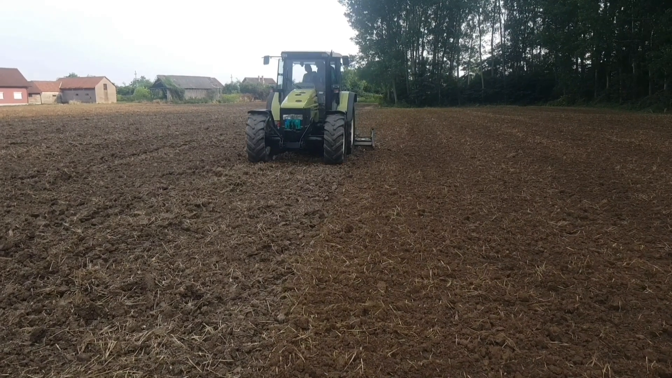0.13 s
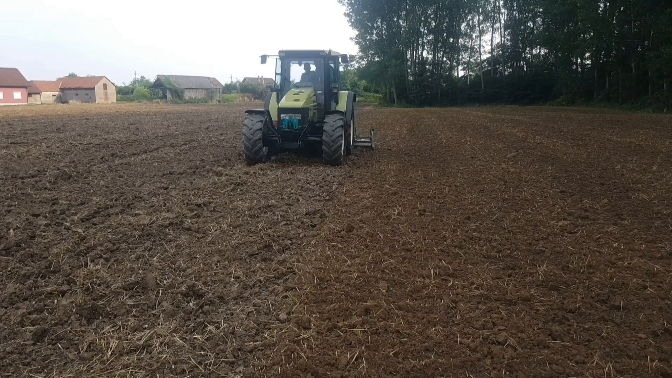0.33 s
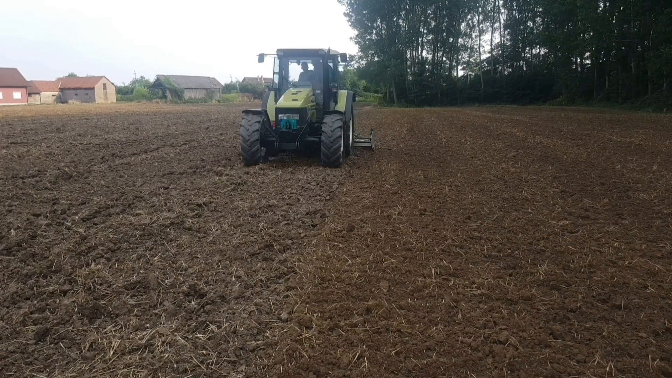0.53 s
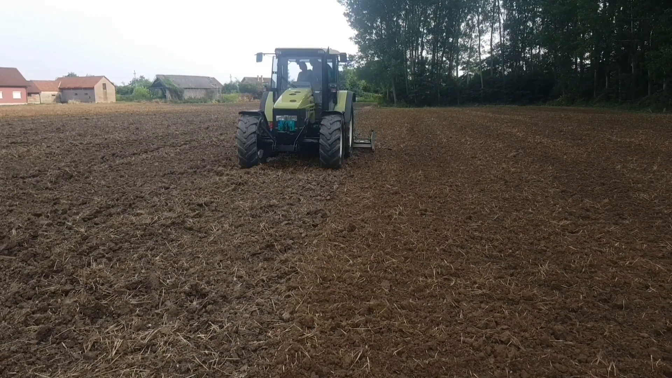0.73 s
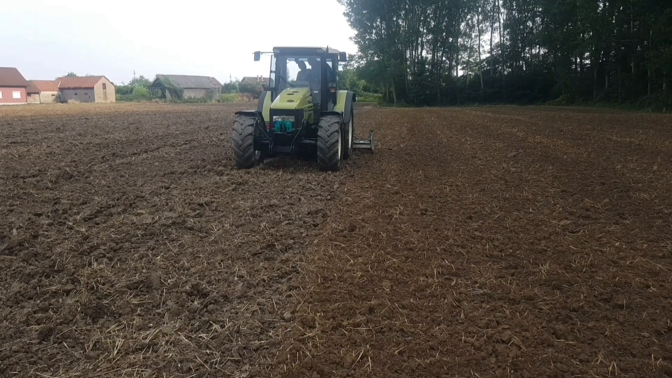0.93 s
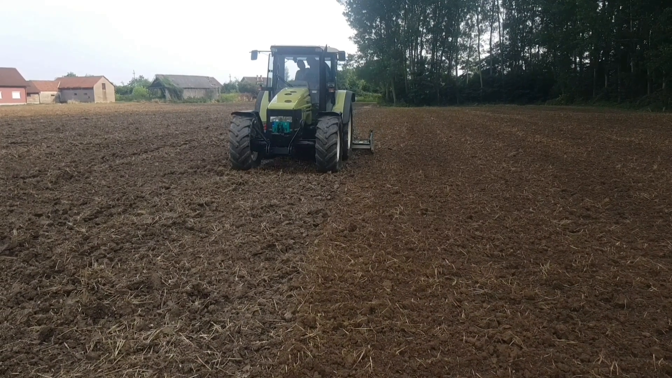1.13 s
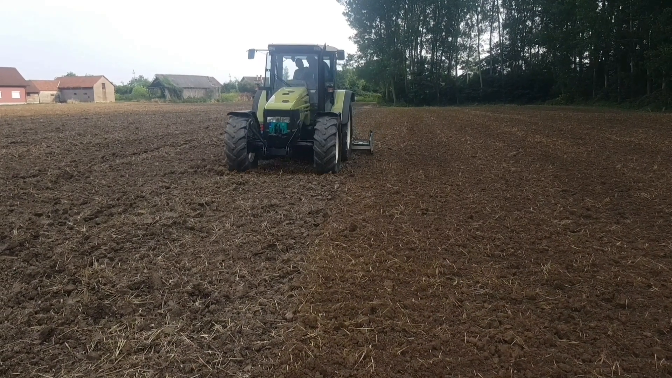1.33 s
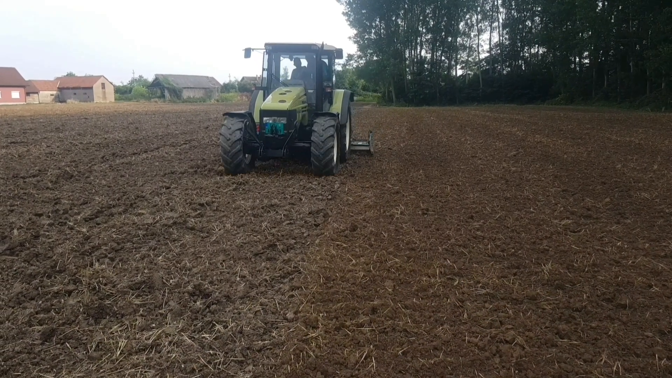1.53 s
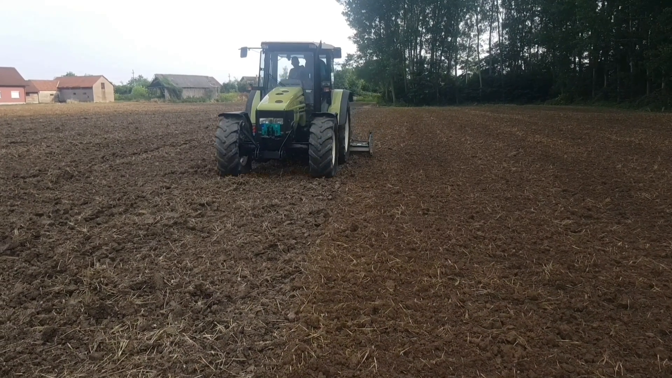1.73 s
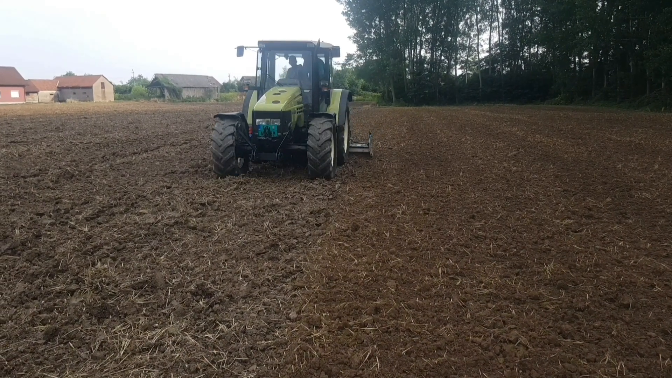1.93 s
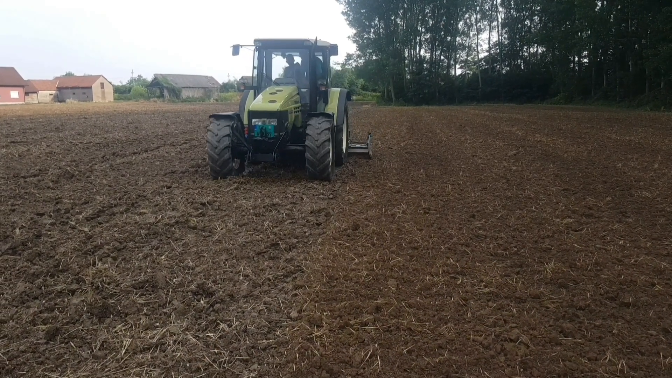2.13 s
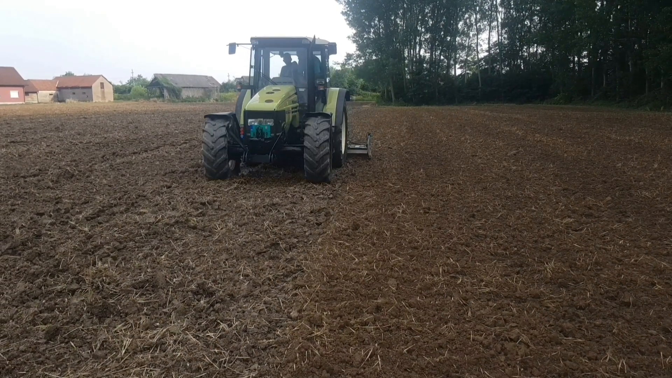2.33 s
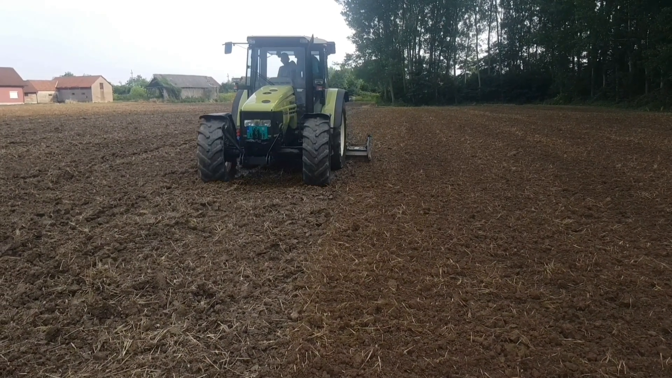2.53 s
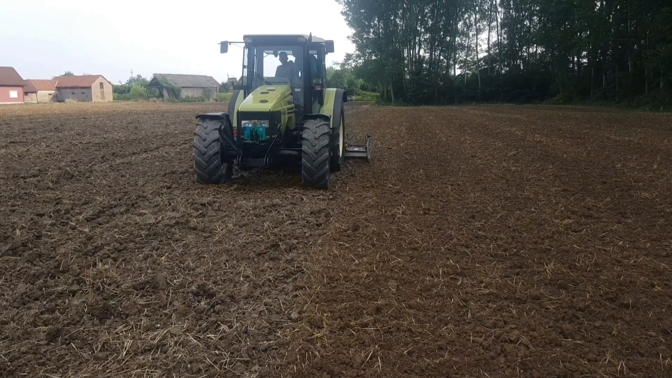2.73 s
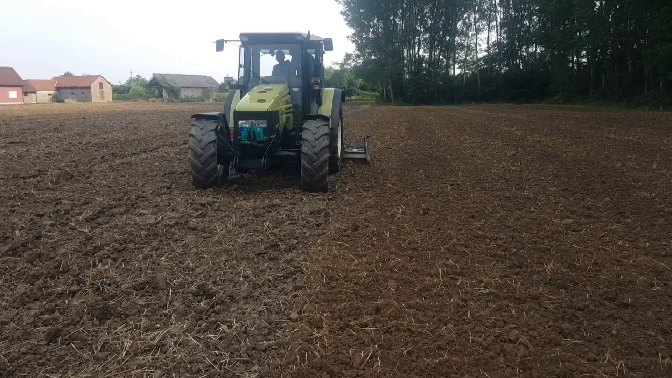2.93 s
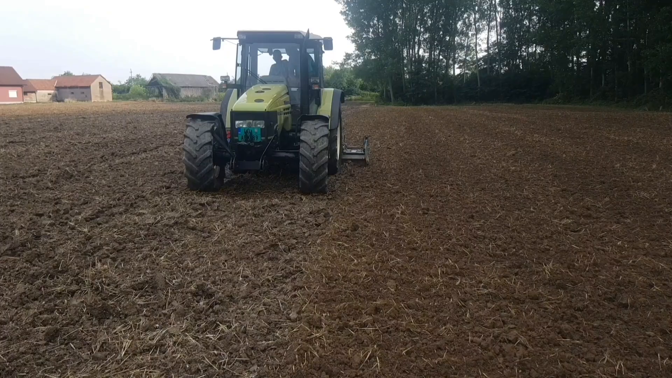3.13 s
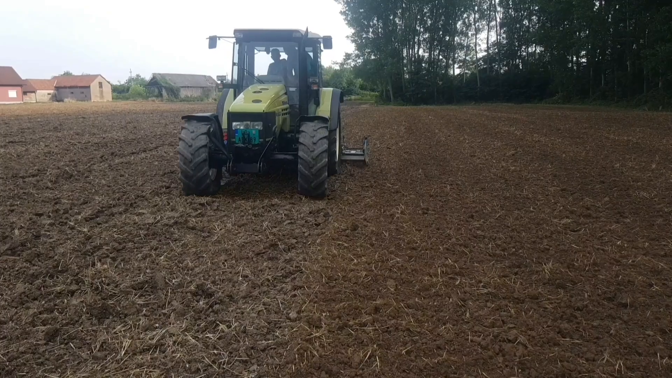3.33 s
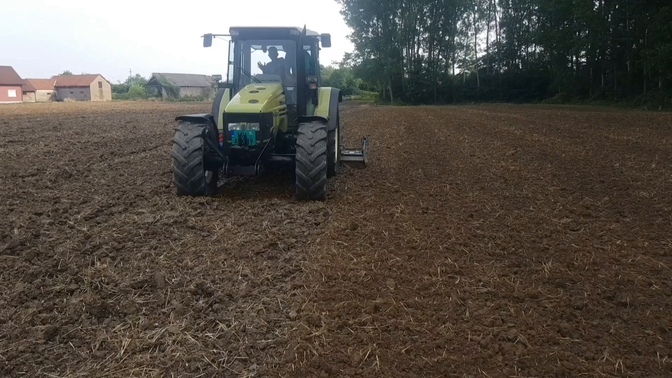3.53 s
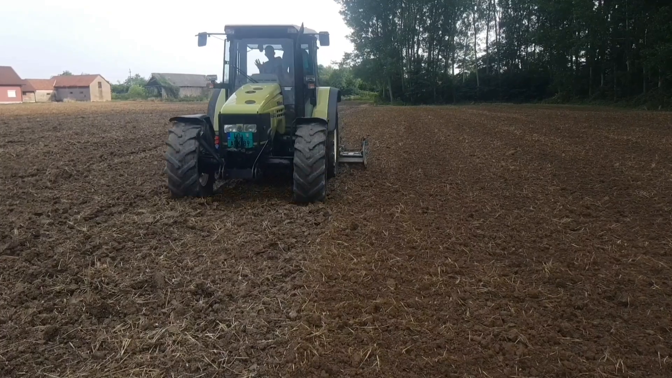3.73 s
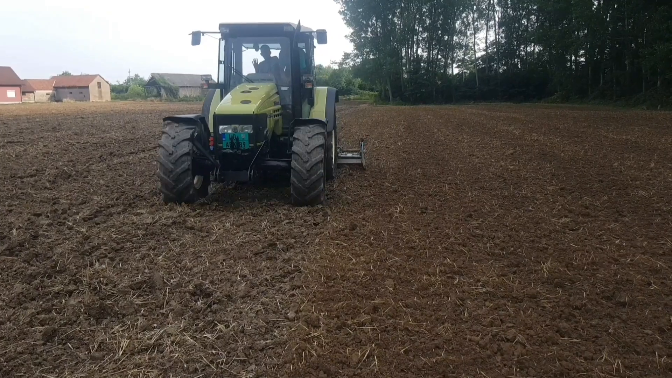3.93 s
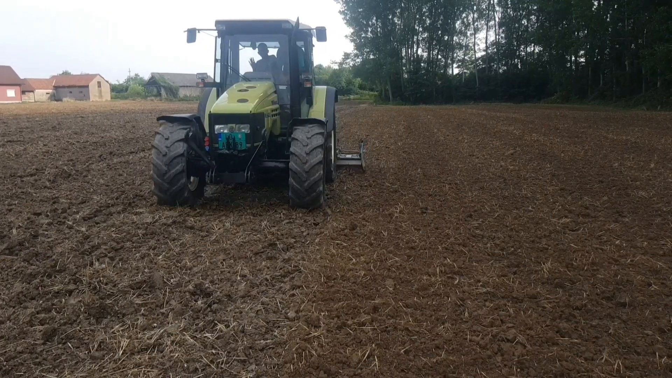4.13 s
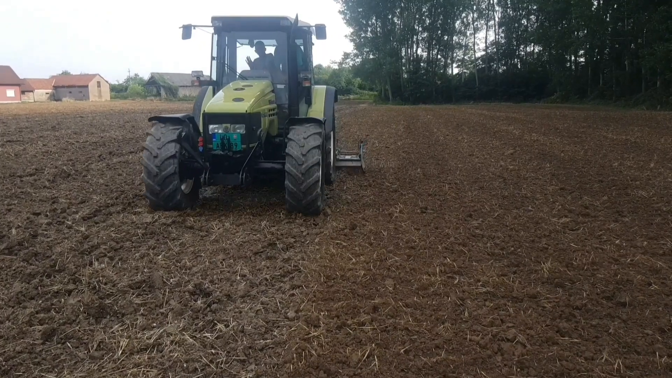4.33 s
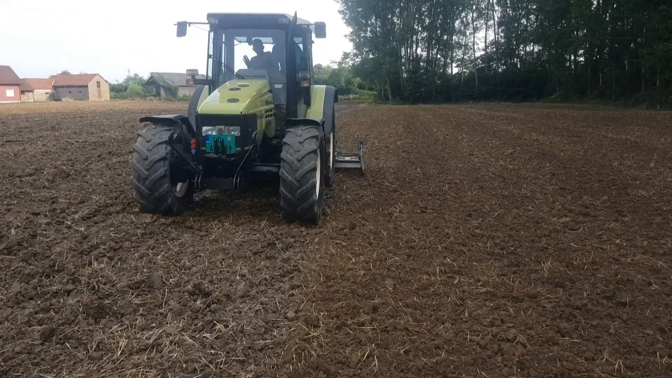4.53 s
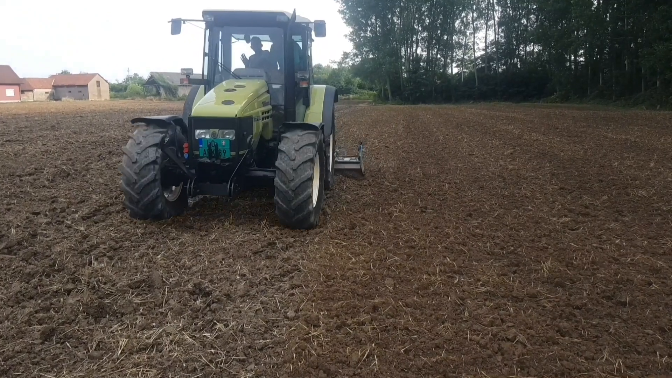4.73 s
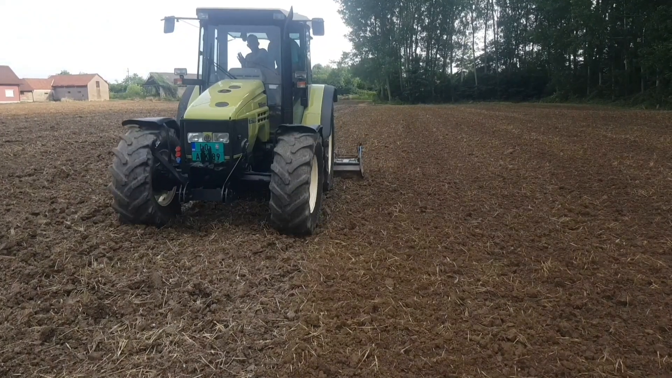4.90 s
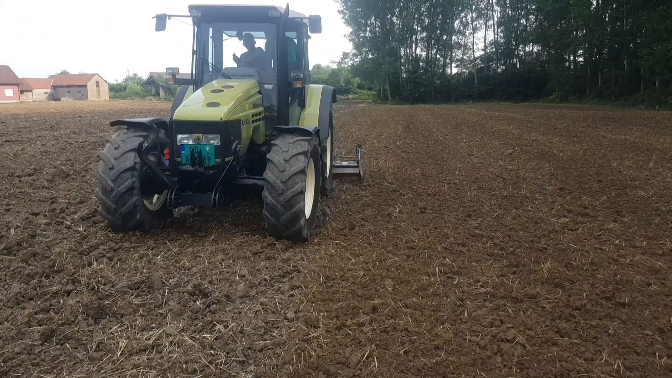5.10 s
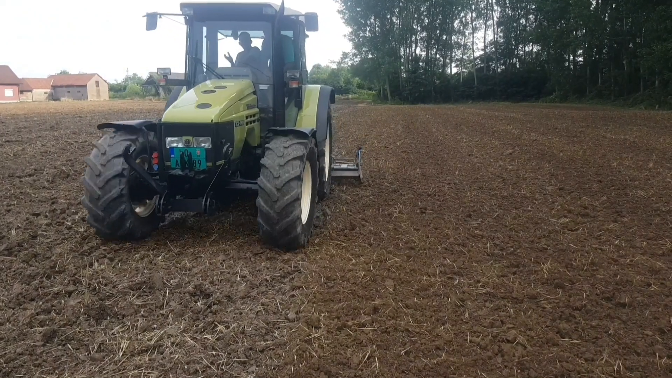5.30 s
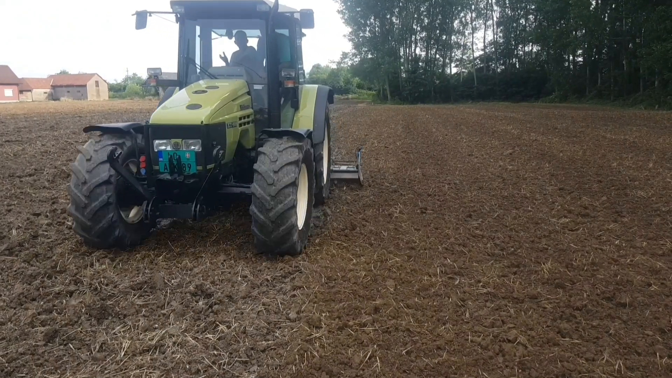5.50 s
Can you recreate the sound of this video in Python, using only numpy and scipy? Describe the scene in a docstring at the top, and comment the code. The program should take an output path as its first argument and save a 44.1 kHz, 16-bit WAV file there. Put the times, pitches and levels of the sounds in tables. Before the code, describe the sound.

A tractor diesel drones steadily under load, with a singing fan and hard clatter, slowly approaching as its harrow hisses through dry stubble.

```python
"""A deep exhaust drone with a singing fan, a hard diesel clatter and a dry hiss of soil and straw:
a four-cylinder tractor pulls a harrow over a stubble field, slowly approaching the microphone.
Exhaust, fan, gears and growl are tones locked to one crankshaft; roar, clatter and air are coloured noise
pulsed by the firings; the harrow adds hiss, clinks and crackles. The speed sags and recovers with the load."""
import sys
import numpy as np
from scipy import signal
from scipy.fft import rfft, irfft
from scipy.io import wavfile
from scipy.ndimage import uniform_filter1d, map_coordinates

SR = 44100
rng = np.random.default_rng(int(sys.argv[2]) if len(sys.argv) > 2 else 0)


def dump_mix(stems):
    """Bounce the given channels to the path in sys.argv[1] as a 16-bit WAV at rate SR."""
    frames = np.atleast_2d(stems).T  # one column per channel
    limited = np.clip(frames, -1, 1)  # hard clip at full scale
    pcm = np.round(limited * 32767).astype(np.int16)
    wavfile.write(sys.argv[1], SR, pcm)


N = 249606
TIME = np.arange(N) / SR
BINS_HZ = np.fft.rfftfreq(N, 1 / SR)


def gain_of(db):
    """Decibels to an amplitude factor."""
    return 10 ** (np.asarray(db) / 20)


def evened(x):
    """Scales a signal to rms 1, all channels together."""
    return x / np.sqrt(np.mean(x ** 2) + 1e-20)


def read(points, hz):
    """A spectrum, joined on a log-frequency axis."""
    f, value = np.transpose(points)
    return np.interp(np.log(hz + 1), np.log(f + 1), value)


def curves(rows):
    """Each column of a timed table at every sample."""
    s, *columns = np.transpose(rows)
    return [np.interp(TIME, s, column) for column in columns]


def drift(rate_hz):
    """Slow chance of rms 1: noise that fades out above the given rate."""
    lowpass = np.exp(-(BINS_HZ / rate_hz) ** 2) * (BINS_HZ > 0)
    return evened(irfft(rfft(rng.standard_normal(N)) * lowpass, N))


def ports(pair, colour_db):
    """Colours two signals and blends them for two microphone ports, mostly alike in the bass, apart on top."""
    # likeness of the two ports: (f/Hz, likeness 0 to 1)
    likeness = [(60, 0.97), (450, 1), (730, 0.93), (1200, 0.68), (2000, 0.97), (3300, 0.33), (5500, 0.28),
                (9000, 0.12), (15000, .1)]
    a, b = rfft(pair) * gain_of(colour_db)
    alike = np.clip(read(likeness, BINS_HZ), 0, 1)
    left = alike * a + np.sqrt(1 - alike ** 2) * b
    return evened(irfft([left, a], N))


def tone(firings, order, db, phase=0):
    """One clean multiple of the four-firing cycle; the level is rms, the phase in turns."""
    return np.sqrt(2) * gain_of(db) * np.sin(2 * np.pi * (order * firings / 4 + phase))


def bursts(firings, depth, decay, uneven_db, scatter_db):
    """Each firing gives a surge that dies away; the cylinders differ, and so does each stroke."""
    stroke = firings.astype(int)
    cylinder_db = uneven_db * np.cos(np.pi / 2 * stroke)
    stroke_db = scatter_db * rng.standard_normal(stroke.max() + 1)[stroke]
    fade = np.exp(-(firings % 1) / decay)
    return evened(1 + depth * gain_of(cylinder_db + stroke_db) * fade)


def repeating(cycles, size=8192):
    """Two random rattles that come back alike in every engine cycle, with all their orders equally strong."""
    pattern = irfft(np.exp(2j * np.pi * rng.random((2, size // 8))), size * 2)
    place = np.arange(size * 2) / (size * 2)
    return evened(np.array([np.interp(cycles, place, row, period=1) for row in pattern]))


def combustion(firings, repeat, surge):
    """Noise that is partly the same in each cycle and partly fresh, pulsed by the firings."""
    repeat = np.clip(repeat, 0, 1)
    same = np.sqrt(repeat) * repeating(firings / 4)
    fresh = np.sqrt(1 - repeat) * rng.standard_normal((2, N))
    return surge * (same + fresh)


# In the layers below, near_db is the gain from nearing (0 at the start), near_share the part a layer takes.
def straw(near_db, level_db=-68.5, near_share=.6, per_s=70, spread_db=4.0, snap_s=.0006):
    """Dry stubble snaps under the tyres: tiny crackles of decaying noise at the very top."""
    # colour of the crackle: (f/Hz, relative level/dB)
    crackle_colour = [(3000, -30), (6000, -6), (9000, -9), (12000, 0), (15000, 0)]
    force_db = spread_db * np.minimum(rng.exponential(1, N), 3)
    # the order of the draws does not matter: each sample may snap by chance
    snaps = (rng.random(N) < per_s / SR) * gain_of(force_db)
    envelope = signal.lfilter([1], [1, -np.exp(-1 / (snap_s * SR))], snaps)
    crackle = envelope * rng.standard_normal((2, N))
    return gain_of(level_db + near_share * near_db) * ports(crackle, read(crackle_colour, BINS_HZ))


def tines(near_db, level_db=-49.0, near_share=0.77, per_s=90, spread_db=2.0, ring_s=0.0028):
    """Clods and stones hit the harrow: a dense, faint clinking, each part with a pitch of its own."""
    # clinks of the harrow: (lowest f/Hz, highest f/Hz)
    clink_range = (997, 2510)
    parts = 12
    t, out = np.arange(0, .03, 1 / SR), np.zeros((2, N))
    for hz in np.geomspace(*clink_range, parts):
        force_db = spread_db * np.minimum(rng.exponential(1, N), 2)
        hits = (rng.random(N) < per_s / parts / SR) * gain_of(force_db)
        clink = np.exp(-t / ring_s) * np.sin(2 * np.pi * hz * t)
        out += rng.uniform(0.3, 1, (2, 1)) * signal.oaconvolve(hits, clink)[:N]
    return gain_of(level_db + near_share * near_db) * evened(out)


def harrow(firings, near_db, level_db=-54.5, near_share=0.68, grain_db=0.7):
    """Fine hiss of crumbling soil and straw, with a little pulsing hiss from the engine."""
    # colour of the hiss: (f/Hz, relative level/dB)
    hiss_colour = [(2000, -26), (6000, 1), (8000, -9), (9000, 0.5), (10500, 3.5), (12500, 2), (15000, -5.5),
                   (16000, -16)]
    pulse = bursts(firings, depth=0.076, decay=.4, uneven_db=-3, scatter_db=6.0)
    grains = pulse * gain_of(grain_db * drift(120)) * rng.standard_normal((2, N))
    return gain_of(level_db + near_share * near_db) * ports(grains, read(hiss_colour, BINS_HZ))


def whistles(fade_s=0.38, waver_db=3.0):
    """Narrow bands of rushing air glide a little as they fade in and out."""
    # airy whistles: (start t/s, end t/s, first f/Hz, last f/Hz, width/Hz, mean level before fades/dB)
    glides = [(0.6, 2.3, 5120, 5250, 190, -64), (2.3, 3.6, 5850, 5900, 340, -59),
              (3.8, 4.9, 5900, 5860, 380, -59)]
    out = np.zeros((2, N))
    for start, end, first_hz, last_hz, width, db in glides:
        gate = np.clip(np.minimum(TIME - start, end - TIME) / fade_s, 0, 1)
        hz = np.interp(TIME, (start, end), (first_hz, last_hz))
        turn = np.exp(2j * np.pi * np.cumsum(hz) / SR)
        # slow complex noise, shifted up to the gliding pitch
        a, b = irfft(rfft(rng.standard_normal((2, 2, N))) / (1 + (2 * BINS_HZ / width) ** 2), N)
        band = evened(((a + 1j * b) * turn).real)
        out += gain_of(db + waver_db * drift(3)) * gate * band
    return out


def air(firings, near_db, level_db=-54.5, near_share=0.23, flicker_db=2.0):
    """Hiss of the engine's air flow, pulsing lightly with the firings."""
    # colour of the air flow: (f/Hz, relative level/dB)
    air_colour = [(2000, -27), (3300, 4), (4100, -2), (5000, 3.5), (6000, 4), (6700, -8.5), (7800, -16),
                  (11000, -40)]
    pulse = bursts(firings, depth=.45, decay=.35, uneven_db=-2, scatter_db=6.0)
    flow = combustion(firings, repeat=0.1, surge=pulse * gain_of(flicker_db * drift(13)))
    return gain_of(level_db + near_share * near_db) * ports(flow, read(air_colour, BINS_HZ))


def gears(firings, near_db, near_share=0.23, waver_db=2.0, wobble=0.13):
    """The belt drive hums steadily; the timing gears whine on and off, wavering with their play."""
    # tones of the belt drive: multiples of the four-firing cycle, and their levels/dB at mean nearness
    belt_orders = (2.889, 5.779, 30.7, 42.35, 47.7, 73.8)
    belt_db = (-44.5, -44.5, -48, -46.5, -58.5, -52.5)
    # whine of the timing gears before its waver: (t/s, level/dB)
    whine_level = [(0, -56), (.4, -47), (.85, -62), (1.45, -44), (1.95, -56), (2.5, -49.5), (3.4, -52),
                   (4.1, -48.5), (4.4, -54), (4.8, -45), (5.1, -42.5), (5.66, -60)]
    belt = sum(tone(firings, order, db, rng.random()) for order, db in zip(belt_orders, belt_db))
    whine_db = curves(whine_level)[0] + waver_db * drift(12)
    whine = tone(firings, 106, whine_db, wobble * drift(18))
    return belt * gain_of(near_share * (near_db - near_db.mean())) + whine


def fan(firings, level_db=-0.27, flutter_db=0.6, wobble=0.16):
    """The belt-driven fan sings a little below the eighth firing harmonic."""
    # fan tones: (multiple of the blade tone, level relative to it/dB)
    blade_tones = [(1, 0), (12 / 11, -17), (2, -22)]
    # blade tone before trim and flutter: (t/s, level/dB)
    blade_level = [(0.0, -31), (0.48, -35), (0.72, -32), (1.44, -32.5), (1.84, -34.5), (2.32, -29.5),
                   (2.64, -32.5), (2.72, -28.5), (3.12, -34), (3.36, -29.5), (4.24, -34), (4.48, -30),
                   (4.64, -33.5), (5.66, -33)]
    passes_per_firing = 7.9455
    angle = 2 * np.pi * passes_per_firing * firings + wobble * drift(1.9)
    tones = sum(gain_of(db) * np.cos(k * angle + 2 * np.pi * rng.random()) for k, db in blade_tones)
    return np.sqrt(2) * gain_of(level_db + curves(blade_level)[0] + flutter_db * drift(15)) * tones


def throb(firings, near_db, level_db=-49.5, near_share=1.2):
    """The fourth firing harmonic beats slowly against an equally strong tone just below it."""
    lull_s, beats_per_firing = .19, .0255  # the beat is silent at the lull
    slip = beats_per_firing * (firings - np.interp(lull_s, TIME, firings))
    # the product equals the difference of the two tones
    return 2 * np.sin(np.pi * slip) * tone(firings - slip / 8, 16, level_db + near_share * near_db)


def growl(firings, near_db, level_db=-0.5, near_share=0.39, bloom_share=1.4, mean_near_db=3.5, waver_db=1.0):
    """Unequal cylinders give a comb of tones, joined by a few high gear whines; above order 10 they grow in
    nearing, the low middle ones most."""
    # weaker engine tones: (multiple of the four-firing cycle, level before trim, nearing and waver/dB)
    comb = [(3, -59), (5, -52), (7, -44.5), (9, -50), (10, -50), (11, -48.5), (13, -54.5), (15, -52),
            (18, -53.5), (19, -50), (20, -59), (21, -46.5), (23, -50), (24, -50), (25, -53.5), (27, -71),
            (28, -45), (29, -46), (30, -55.5), (33, -53), (34, -44), (35, -45.5), (36, -42), (37, -47.5),
            (38, -50), (39, -44.5), (40, -44.5), (41, -49), (42, -51), (43, -55.5), (44, -56), (45, -47.5),
            (46, -51), (59, -54.5), (61, -51.5), (148, -57)]
    out = np.zeros(N)
    for order, db in comb:
        share = 0 if order <= 10 else bloom_share if order <= 21 else near_share
        tone_db = level_db + db + share * (near_db - mean_near_db) + waver_db * drift(1.8)
        out += tone(firings, order, tone_db, rng.random())
    return out


def rumble(firings, near_db, level_db=-39.5, near_share=0.15, rush_db=-46.0, rush_share=0.97):
    """Rough low gas flow between the exhaust tones; a rush above it grows quickly as the tractor nears."""
    # colours of the low flow and of the rush: (f/Hz, relative level/dB)
    low_colour = [(8, -13), (34, -1), (48, 2), (72, 5.5), (96, 3), (125, 2.5), (180, 0.5), (210, -1),
                  (235, -10), (300, -24), (900, -50)]
    rush_colour = [(170, -34), (230, -1.5), (255, -0.5), (340, 2.5), (400, -7), (440, 2.5), (500, -8),
                   (900, -45)]
    pulse = bursts(firings, depth=1.0, decay=0.25, uneven_db=-6, scatter_db=1.0)
    flow = pulse * rng.standard_normal((2, N))
    low = gain_of(level_db + near_share * near_db) * ports(flow, read(low_colour, BINS_HZ))
    rush = gain_of(rush_db + rush_share * near_db) * ports(flow, read(rush_colour, BINS_HZ))
    return low + rush


def roar(firings, near_db, level_db=-34.5, near_share=0.31, flutter_db=0.74):
    """The throaty middle of the engine and the rush of air through the fan: a fluttering puff per firing."""
    # colour of the roar: (f/Hz, relative level/dB)
    roar_colour = [(330, -45), (410, -11), (440, -6.5), (465, -7), (492, -5.5), (545, -3.5), (570, -3),
                   (592, 2.5), (625, -2), (660, -7), (695, -1.5), (725, -5), (760, -16), (790, -9),
                   (830, -20), (1100, -46)]
    # slow rise and fall of the roar: (t/s, lift/dB)
    swell = [(0, 1), (1.45, 0.5), (1.7, -4), (2.2, -2), (2.8, 1.1), (4.6, 0), (5.66, -1.5)]
    surge = bursts(firings, depth=1.4, decay=0.26, uneven_db=2.0, scatter_db=1.0)
    level = gain_of(level_db + near_share * near_db + curves(swell)[0] + flutter_db * drift(21))
    return level * ports(surge * rng.standard_normal((2, N)), read(roar_colour, BINS_HZ))


def knocks(firings, depth, decay=0.29, scatter_db=8.5):
    """Each cylinder knocks once a cycle, at its own moment and with a new chance force each time."""
    # knock of each cylinder: (place in the cycle/firings, relative strength before scatter/dB)
    cylinders = [(0.45, -3), (1.45, -7), (2.252, 3.5), (3.55, -3)]
    surge = np.ones(N)
    for place, db in cylinders:
        cycle, since = np.divmod(firings + 4 - place, 4)
        force_db = db + scatter_db * rng.uniform(-1.3, 1, size=256)[cycle.astype(int)]
        surge += depth * gain_of(force_db) * np.exp(-since / decay)
    return evened(surge)


def clatter(firings, distance_m, near_db, sag_hz, level_db=-36.0, near_share=0.59, speed_db_per_hz=0.03):
    """Diesel knock, harder at higher speed, rings the block and its panels, whose colour shifts on the way."""
    # colour of the block: (f/Hz, relative level/dB)
    block_colour = [(600, -22), (830, -2.5), (1030, -2), (1350, -1.5), (1550, -4.5), (2000, -4),
                    (2400, -4.5), (2800, -6.5), (3100, -12), (4100, -18.5), (6000, -23), (6700, -28.5),
                    (7800, -39), (11000, -60)]
    # ringing panels: (f/Hz, width/Hz, lift when far/dB, lift when near/dB)
    panels = [(967, 40, 7, 3.5), (1074, 78, 5, 3.5), (1187, 24, -2, 4), (1462, 20, 11.5, 6.5),
              (1777, 33, 1.5, 5), (2100, 190, 3.5, 0.5), (2910, 97, -1.5, 2.5), (3450, 37, 3, 4.5)]
    # surges of the clatter: (t/s, lift/dB)
    swell = [(0, 0), (1.35, 0.8), (2.1, -0.5), (3.8, -0.5), (4.15, 0.5), (4.5, -1), (4.85, 0.7), (5.2, 0.5),
             (5.66, 0)]
    far_m, near_m = 14, 13.6  # the panels change colour between these distances
    knock = combustion(firings, repeat=0.17, surge=knocks(firings, depth=0.34))
    hz, width, far_lift_db, near_lift_db = np.transpose(panels)
    bells = .5 ** ((2 * (BINS_HZ[:, None] - hz) / width) ** 2)
    block_db = read(block_colour, BINS_HZ)
    far = ports(knock, block_db + bells @ far_lift_db)
    near = ports(knock, block_db + bells @ near_lift_db)
    nearness = np.clip((far_m - distance_m) / (far_m - near_m), 0, 1)
    level = gain_of(level_db + near_share * near_db - speed_db_per_hz * sag_hz + curves(swell)[0])
    return level * ((1 - nearness) * far + nearness * near)


def ring(pair):
    """The ring near 1 kHz swells and eases."""
    # level of the ring: (t/s, lift/dB)
    ring_lift = [(0, -1), (2.0, 0), (2.9, 0.3), (3.6, 1.5), (4.55, 0.5), (4.85, 3), (5.2, 1.5), (5.66, -1)]
    centre_hz, width_hz = 1040, 100
    band = irfft(rfft(pair) * .5 ** ((2 * (BINS_HZ - centre_hz) / width_hz) ** 2), N)
    return pair + (gain_of(curves(ring_lift)[0]) - 1) * band


def path(pair):
    """An echo off the machine combs the treble; its colour wanders as the tractor rocks over the clods."""
    # echo, strongest while the tractor is far: (t/s, comb spacing/Hz, strength as a factor)
    echo = [(0, 566, .3), (1.2, 573, .42), (2.1, 579, .38), (2.5, 584, .06), (5.66, 590, .02)]
    spacing_hz, strength = curves(echo)
    bright = irfft(rfft(pair) * np.clip(BINS_HZ / 1500, 0, 1) ** 4, N)  # weak below 1500 Hz
    late = np.array([np.interp(TIME - 1 / spacing_hz, TIME, side) for side in bright])
    combed = (pair + strength * late) / np.sqrt(1 + strength ** 2)
    z = signal.stft(combed, nperseg=512)[2]
    # random lifts, smoothed over frequency and time
    patches = rng.standard_normal(z.shape[1:])
    for _ in range(2):
        patches = uniform_filter1d(uniform_filter1d(patches, size=3, axis=0), size=70, axis=1)
    return signal.istft(z * gain_of(.6 * evened(patches)), nperseg=512)[1][:, :N]


def exhaust(firings, first_db=-0.18, second_db=0.0, third_db=0.0):
    """Pressure jumps as each valve opens, then sinks: a boom of three harmonics with a drone above."""
    # firing harmonics before trim: (t/s, first level/dB, second level/dB, third level/dB)
    boom_levels = [(0.0, -26, -32, -39), (0.24, -26, -31, -48), (0.56, -27.5, -33.5, -40.5),
                   (1.12, -26, -32, -48), (1.6, -28.5, -32, -45), (2.4, -26.6, -31.5, -46),
                   (3.04, -27, -33, -39.5), (3.2, -25.5, -32.5, -48), (3.44, -27, -31.5, -42.5),
                   (3.68, -24, -32.5, -39), (3.76, -26, -30.5, -49), (4.08, -26, -36, -37),
                   (4.48, -26, -30, -41.5), (4.72, -25, -31.5, -39), (4.88, -26, -33.5, -35),
                   (5.2, -28.5, -34, -39.5), (5.28, -28.2, -32, -34), (5.66, -25, -32.5, -32.5)]
    # drone just above the fourth firing harmonic: (t/s, level/dB)
    drone_level = [(0, -44.5), (1.1, -44), (2.7, -39.5), (3.7, -42), (4.65, -37), (5, -42), (5.25, -56),
                   (5.4, -52), (5.66, -33)]
    valve_lead = .25  # the valve opens this far ahead of the next firing, in firings
    levels = [db + trim for db, trim in zip(curves(boom_levels), (first_db, second_db, third_db))]
    boom = sum(tone(firings + valve_lead, 4 * k, db) for k, db in enumerate(levels, 1))
    return boom + tone(firings, 17, curves(drone_level)[0], rng.random())


def scene():
    """One crankshaft drives every engine sound; load shows as a sag in speed, nearing lifts most layers."""
    # engine speed before its slight jitter: (t/s, firing rate/Hz)
    speed = [(0.0, 64.77), (0.14, 64.89), (0.36, 66.07), (1.06, 65.35), (1.52, 66.68), (2.15, 65.45),
             (2.69, 65.25), (3.16, 65.31), (3.37, 64.34), (3.63, 64.65), (3.95, 66.65), (4.26, 65.89),
             (4.38, 64.92), (4.62, 65.2), (4.94, 67.07), (5.18, 67.37), (5.46, 66.35), (5.66, 64.94)]
    cruise_hz = 66.8  # firings a second under the usual pull
    start_m, drive_m_per_s = 17.3, 1.77  # straight at the microphone
    firing_hz, = curves(speed)
    firings = np.cumsum(firing_hz * (1 + .0005 * drift(9))) / SR
    sag_hz = cruise_hz - firing_hz
    distance_m = np.maximum(start_m - drive_m_per_s * TIME, 1)
    near_db = 20 * np.log10(start_m / distance_m)
    tones = exhaust(firings) + growl(firings, near_db) + throb(firings, near_db)
    tones = tones + fan(firings) + gears(firings, near_db)
    body = rumble(firings, near_db) + roar(firings, near_db)
    knocking = ring(clatter(firings, distance_m, near_db, sag_hz))
    treble = path(knocking + air(firings, near_db)) + whistles()
    ground = harrow(firings, near_db) + tines(near_db) + straw(near_db)
    return tones + body + treble + ground


def record(dry):
    """The left port, weaker over most of the range, hears the tractor a little sooner; then the band limit."""
    # level balance of the ports: (f/Hz, left minus right level/dB)
    tilt = [(60, -5), (92, -11.5), (140, -4.5), (210, -5.5), (330, -5), (500, -4), (760, -6.5), (1160, -6),
            (1780, -5.5), (2720, -7), (4150, -9), (6340, -9), (9680, 2.5), (14800, -4.5)]
    # the tractor drifts to the left: (t/s, lead of the left port/s)
    lead = [(0, .00002), (5.66, .0001)]
    edge_hz = 15400
    left = map_coordinates(dry[0], [(TIME + curves(lead)[0]) * SR], order=5, mode="mirror")
    ratio = gain_of(read(tilt, BINS_HZ))
    balance = np.array([ratio, np.ones_like(ratio)]) * 2 / (1 + ratio)
    heard = irfft(rfft([left, dry[1]]) * balance, N)
    lowpass = signal.firwin(511, edge_hz, window=("kaiser", 9), fs=SR)
    return signal.oaconvolve(heard, lowpass[None], "same")


dry = scene()
out = record(dry)
dump_mix(out)
```